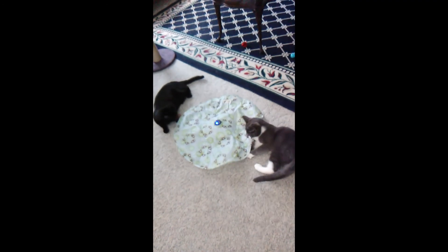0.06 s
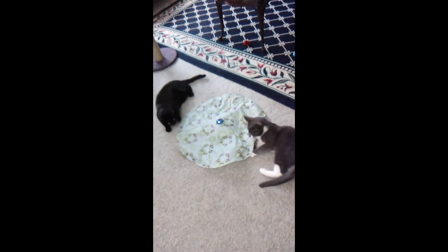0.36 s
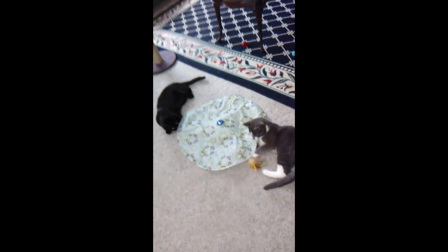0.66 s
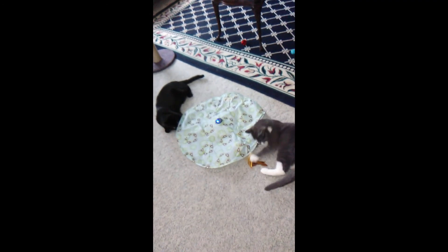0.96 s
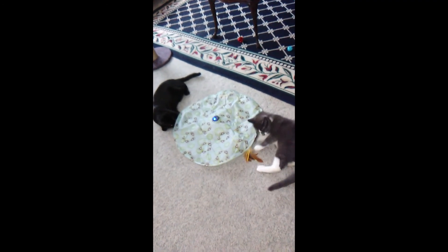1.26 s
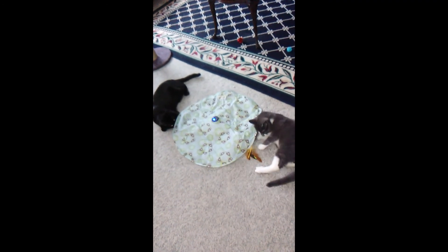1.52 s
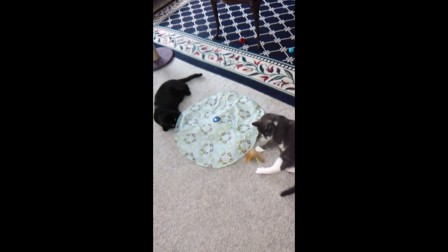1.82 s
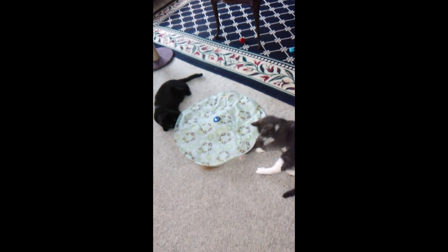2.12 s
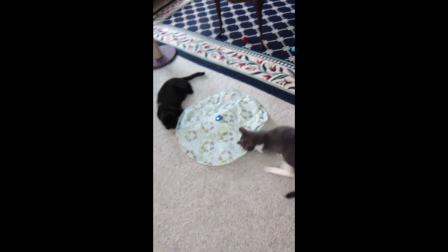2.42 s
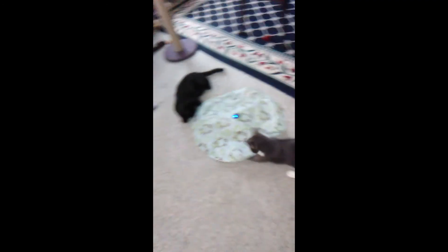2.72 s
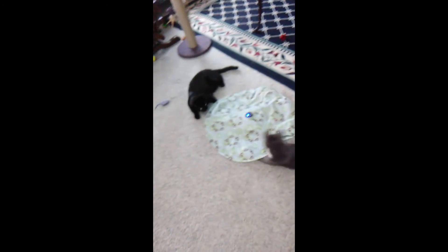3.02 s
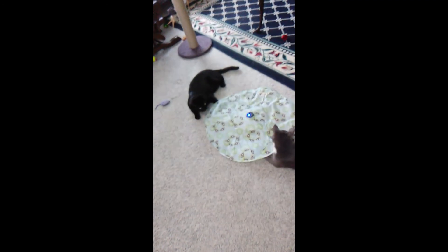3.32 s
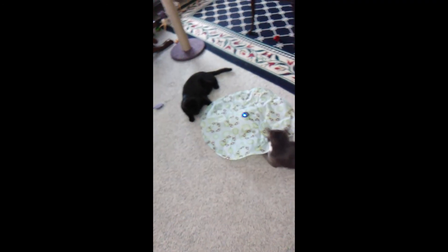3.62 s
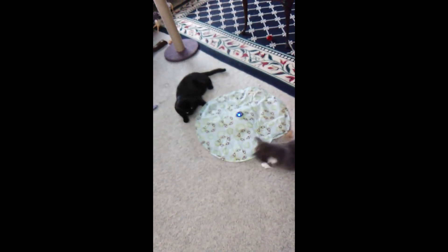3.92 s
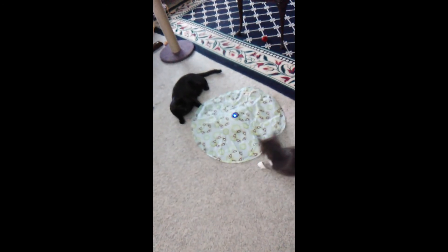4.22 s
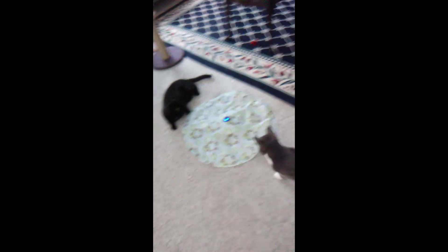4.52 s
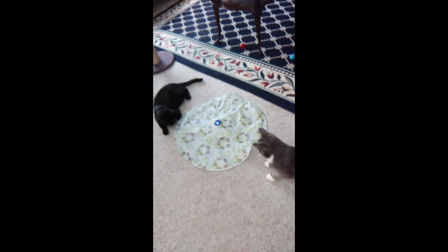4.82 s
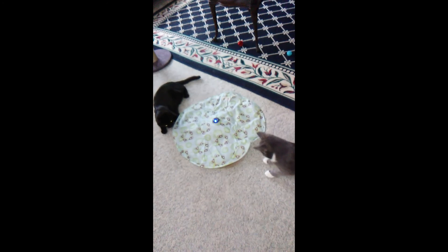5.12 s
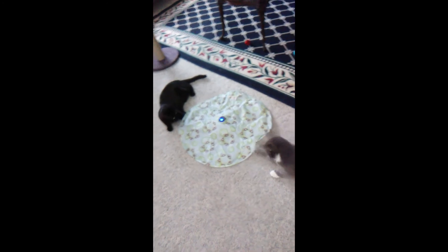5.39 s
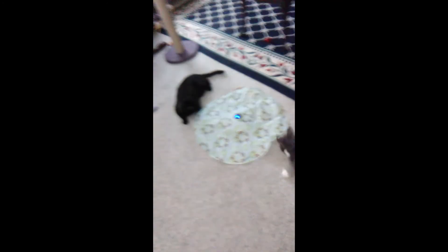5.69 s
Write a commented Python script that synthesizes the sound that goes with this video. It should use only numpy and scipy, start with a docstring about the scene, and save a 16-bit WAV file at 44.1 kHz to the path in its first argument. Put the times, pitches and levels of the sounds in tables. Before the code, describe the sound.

A small geared motor whirrs unsteadily, sweeping a wand beneath a cat toy's nylon cover. The cloth swishes, scrapes and snaps in uneven bursts while cats pat softly at it. After a quieter second the motor resumes with one sharp snap, and busy rustling follows, with light plastic knocks and dull floor thumps. The small carpeted room hums faintly, and the microphone gives the rustle a bright edge.

```python
"""In a small, faintly humming room, a geared motor whirrs and sweeps a wand under a cat toy's nylon cover.
From the start the cloth swishes, scrapes and snaps taut, and soon two cats pat at it. After a quieter
second the motor starts up again, and the loudest snap comes at 2 s. The gears sag under the drag, and the
carpeted floor booms under shifting weight, most near 3 s and 5 s. A short lull at 3.5 s leads into busy
rustling until the end, near 6 s. It is all heard through two microphone ports that ring in the treble."""
import sys
import numpy as np
from scipy import signal
from scipy.fft import rfft, irfft, next_fast_len
from scipy.io import wavfile
from scipy.ndimage import uniform_filter1d, map_coordinates

SR = 44100
rng = np.random.default_rng(int(sys.argv[2]) if len(sys.argv) > 2 else 0)


def bounce(signal):
    """Save signal as a 16-bit WAV file at the path given by the first command-line argument."""
    frames = np.transpose(np.atleast_2d(signal))
    limited = np.clip(frames, -1, 1)
    pcm = np.round(limited * 32767).astype(np.int16)
    wavfile.write(sys.argv[1], SR, pcm)


N = 262395

# folds snapping taut: t/s, level/dB, sheet shake/dB, left minus right/dB, crinkle/dB
# (shake and crinkle are added to the level)
FOLD_SNAPS = [(0.0192, -36.5, -9, 4, -8.5), (0.3153, -35.5, -4, 10, -14), (0.479, -45, -15, -6, -11),
              (0.665, -28, -20, -2, -22.5), (0.6718, -24.5, -24, 1, -29), (1.346, -52, -2.5, 8.5, -14),
              (2.0098, -39.5, -7, 1, -10), (2.0474, -13.5, -16.5, -0.5, -25), (2.352, -31.5, -8, -4, -19),
              (2.5609, -41, 3, -7, -22), (2.6264, -29, -5.5, -3, -13), (2.8843, -35.5, -5, 3, -20),
              (3.146, -46, -8, -2, -18), (3.1971, -28.5, -29, -2, -25), (3.3201, -32.5, -11.5, 5, -24.5),
              (3.368, -34.5, -7, 0, -9.5), (3.4199, -21, -24, -1, -23), (3.428, -26.5, -26, 5, -29),
              (3.8402, -43, 6, -3, -24), (4.2428, -33.5, -24, -5, -18), (4.8941, -36.5, 6.5, 0, -22),
              (5.1751, -25.5, -13, 3, -25), (5.2367, -35.5, -27, 4, -10.5), (5.3818, -35.5, -21, 0, -12.5),
              (5.5428, -30, -33, -2, -19), (5.6049, -33.5, -35, 2, -30), (5.666, -32.5, -30, 9, -12.5),
              (5.673, -29, -33, -10, -18.5), (5.7784, -27.5, -3, -1.5, -26),
              (5.7868, -29.5, -3.5, 3.5, -26)]
# the tone of coarsely scraped cloth: f/Hz, level/dB
SCRAPE_SPECTRUM = [(100, -30), (300, -21), (450, -7.5), (900, -4.5), (1300, 1.5), (1900, 3), (2800, 3),
                   (3500, -4), (4700, -6), (8000, -19.5), (14000, -57)]
# the tone of a crease flipping over: f/Hz, level/dB
CREASE_SPECTRUM = [(300, -5), (1500, -25), (3500, 5.5), (7500, 4), (10500, -1.5), (14500, -18)]


def amp(db):
    """Turn decibels into a gain."""
    return 10 ** (np.asarray(db) / 20)


def unit(x):
    """Scale x to an average (rms) strength of 1."""
    return x / np.sqrt(np.mean(x ** 2) + 1e-20)


def along(points, hz):
    """Read a curve of (frequency, value) points, with octaves evenly spaced."""
    freqs, values = np.transpose(points)
    return np.interp(np.log(hz + 1), np.log(freqs), values)


def wobble(rate):
    """A smooth random curve through rate points a second."""
    points = rng.standard_normal(int(N * rate / SR) + 4)
    return map_coordinates(points, [np.arange(N) * rate / SR])


def gesture(start, rise, hold, fade_db_per_s, sag_db_per_s=0):
    """The gain of one movement: it rises to 1, holds or sags, then fades."""
    t = np.arange(N) / SR - start
    past = np.maximum(t - rise, 0)
    drop_db = sag_db_per_s * past + fade_db_per_s * np.maximum(past - hold, 0)
    return np.clip(t / max(rise, 1e-3), 0, 1) * amp(-drop_db)


def add(track, start, sound):
    """Mix a sound in at start seconds."""
    part = track[:, max(round(start * SR), 0):][:, :sound.shape[1]]
    part += sound[:, :part.shape[1]]


def filtered(x, response):
    """Multiply each frequency in x by response(hz)."""
    n = x.shape[-1]
    size = next_fast_len(n + 8192)
    return irfft(rfft(x, size) * response(np.fft.rfftfreq(size, 1 / SR)), size)[..., :n]


def coloured(x, spectrum, size=4096):
    """Give stereo x this spectrum, with a filter that rings only after each sound."""
    cepstrum = irfft(np.log(amp(along(spectrum, np.fft.rfftfreq(size, 1 / SR)))))
    cepstrum[1:size // 2] *= 2
    cepstrum[size // 2 + 1:] = 0
    ring = irfft(np.exp(rfft(cepstrum)))
    return signal.fftconvolve(x, ring[None], axes=1)[:, :x.shape[1]]


def spread(pair):
    """Two unrelated signals become left and right, alike in the lower tones only."""
    # how alike the two sides are: f/Hz, likeness from 0 to 1
    likeness = [(60, 0.7), (300, 0.74), (750, 0.47), (1400, 0), (14000, 0)]
    turn = lambda hz: np.arccos(np.clip(along(likeness, hz), -1, 1)) / 2
    mid, side = filtered(pair, lambda hz: np.array([np.cos(turn(hz)), np.sin(turn(hz))]))
    return np.array([mid + side, mid - side])


def noise(spectrum, size=N):
    """Steady stereo noise with this spectrum."""
    return unit(coloured(spread(rng.standard_normal((2, size))), spectrum))


def puff(spectrum, t60, size=8192):
    """A burst of noise that fades by 60 dB in t60 seconds."""
    return noise(spectrum, size) * amp(-60 * np.arange(size) / SR / t60)


def slips(rate, scatter_db, smooth_db):
    """Friction: tiny slips of scattered size, rate a second, over a smooth hiss."""
    sizes = amp(scatter_db * np.clip(rng.standard_normal(N), -2, 2))
    sizes *= rng.random(N) < rate / SR
    turn = rng.uniform(0, 2 * np.pi, N)  # every slip sends its sound its own way
    grains = unit(sizes * np.array([np.cos(turn), np.sin(turn)]))
    return spread(grains + amp(smooth_db) * rng.standard_normal((2, N)))


def room_tone():
    """Still air and a faint, slightly unsteady hum."""
    # the tones of the hum: f/Hz, level/dB
    tones = [(61, -78.5), (610, -89), (731, -84.5), (853, -85), (1218, -93)]
    # the hush of the air: f/Hz, level/dB
    air = [(20, -7), (60, -0.5), (110, -1), (200, 0.5), (320, -6.5), (480, -14.5), (750, -6.5), (1100, -16),
           (2000, -14.5), (3500, -20.5), (8000, -27), (9100, -21), (10200, -28), (14500, -28)]
    t = np.arange(N) / SR
    hum = sum(amp(db) * np.sqrt(2) * np.sin(2 * np.pi * hz * t + 1.5 * wobble(4)) for hz, db in tones)
    return hum + amp(-73) * noise(air)


def motor():
    """Drag makes the motor louder and slower. Gives its free gain, its gain with drag, and its pitch."""
    # the motor running freely: t/s, length/s, level/dB
    runs = [(0, .4, -65.5), (0.471, 0.15, -60.5), (1.478, 0.015, -65), (1.782, 1.4, -59),
            (2.874, 0.39, -59.5), (3.621, 0.03, -63.5), (3.8, 1.61, -59.5), (5.427, 0.34, -65.5),
            (5.855, .03, -58.5)]
    # the wand meeting resistance: t/s, length/s, level/dB, pitch drop/Hz
    strains = [(0.009, 0.035, -51.5, 22.6), (0.148, 0.02, -46.5, 6.8), (0.246, 0.052, -45, 22),
               (0.355, 0.033, -55, 5.1), (1.799, 0.037, -48.5, 70), (2.352, .025, -51.5, 14),
               (2.4, .07, -51.5, 184), (2.555, 0.093, -49.5, 11.3), (2.686, 0.13, -64, 11.5),
               (2.922, 0.034, -51, 2.8), (2.996, 0.055, -50.5, 3.9), (3.103, .04, -68, 85),
               (3.196, 0.064, -49, 58), (3.828, 0.039, -45, 46.4), (3.875, 0.048, -52.5, 150),
               (3.932, .05, -51.5, 70), (4.016, .05, -49.5, 50), (4.14, .07, -51.5, 3.33),
               (4.208, 0.052, -50, 3.4), (4.268, 0.202, -55.5, 27.8), (4.49, 0.098, -51, 25.3),
               (4.673, 0.16, -56.5, 2.8), (4.84, 0.22, -50, 32.4), (5.112, .04, -46.5, 44),
               (5.178, 0.034, -44.5, 4.1), (5.253, .11, -51.5, 15), (5.375, 0.032, -50.5, 98)]
    rise_s, free_hz = 0.0117, 795.0
    push = lambda start, length: gesture(start, rise_s, length - rise_s, fade_db_per_s=260)
    running = np.max([amp(db) * push(start, length) for start, length, db in runs], axis=0)
    power, gear_hz = running ** 2, np.full(N, free_hz)
    for start, length, db, drop_hz in strains:
        load = push(start, length)
        power += (amp(db) * load) ** 2
        gear_hz -= drop_hz * load
    return running, np.sqrt(power), gear_hz


def housing(hz):
    """The toy's hollow plastic body rings at a few pitches of its own."""
    # its resonances: f/Hz, width/Hz, level/dB
    rings = [(536.6, 23, -19), (611.5, 10.8, -4.5), (716.6, 63, -1.5), (737, 86, -4), (806, 23, -1.5),
             (1011, 91, -9.5), (1032, 49, -6), (1233, 33, -12)]
    return sum((-1) ** k * amp(db) * 1j * hz * width / (centre ** 2 - hz ** 2 + 1j * hz * width)
               for k, (centre, width, db) in enumerate(rings))


def gears(effort, gear_hz):
    """The gears whirr unsteadily, and their rattle rings the housing."""
    pitch = gear_hz * (1 + 0.017 * wobble(70))
    tone = np.sin(2 * np.pi * np.cumsum(pitch) / SR)
    whirr = unit(tone * amp(4 * wobble(75)))
    rattle = unit(filtered(slips(rate=280, scatter_db=2, smooth_db=-14), housing))
    return amp(-1.5) * effort * unit(0.8 * whirr + rattle)


def rubbing(running):
    """Gains of swish and scrape: each stroke drives both, over the light brushing of the turning wand."""
    # wand or paw dragging the cloth: t/s, rise/s, hold/s, swish level/dB, scrape level/dB
    strokes = [(-0.004, 0.028, 0.01, -46, -45.5), (0.147, 0.022, 0.013, -56, -46.5),
               (0.179, 0.022, 0.035, -45.5, -50), (0.234, 0.05, 0.049, -44, -43),
               (0.35, 0.011, 0.014, -54, -54.5), (0.437, 0.012, .025, -60.5, -55),
               (0.508, 0.015, 0.086, -67.5, -80), (.659, 0.0072, 0.016, -44.5, -73),
               (1.184, 0.023, 0.064, -54, -68), (1.215, 0.016, 0.0076, -64, -54.5),
               (1.333, 0.0093, 0.049, -61.5, -60.5), (1.793, 0.0097, 0.024, -63, -50.5),
               (1.861, .02, 0.15, -62.5, -64), (1.999, 0.053, 0.094, -42, -40.5),
               (2.213, 0.031, 0.018, -45, -49.5), (2.346, 0.002, 0.059, -48, -42.5),
               (2.429, 0.038, 0.022, -43.5, -47), (2.502, 0.0092, 0.034, -64, -49.5),
               (2.542, 0.014, 0.035, -46, -43.5), (2.6, .02, 0.041, -45.5, -43),
               (2.7, 0.017, 0.038, -52.5, -58.5), (2.838, 0.036, 0.0098, -54.5, -51),
               (2.878, 0.0034, 0.052, -51.5, -47), (2.976, 0.031, 0.14, -51, -48.5),
               (3.142, 0.0032, 0.023, -53, -44), (3.176, 0.012, 0.077, -48.5, -47),
               (3.307, 0.0029, 0.051, -55.5, -60), (3.354, .008, 0.029, -56, -48.5),
               (3.416, 0.0027, 0.0099, -39.5, -77), (3.605, .02, 0.022, -74, -76),
               (3.831, 0.0048, 0.034, -55, -47.5), (3.894, 0.028, 0.11, -59.5, -57),
               (4.006, 0.054, .02, -48.5, -49.5), (4.128, 0.014, .03, -70, -57),
               (4.181, 0.026, .05, -47.5, -49), (4.301, 0.052, 0.067, -48.5, -54),
               (4.38, 0.018, .04, -48, -48.5), (4.463, .04, .012, -45.5, -43.5),
               (4.56, .015, 0.012, -60, -81), (4.701, .03, .025, -49.5, -50.5),
               (4.752, 0.012, 0.013, -47, -46.5), (4.794, 0.062, .05, -44.5, -44.5),
               (4.886, 0.017, 0.058, -46, -41), (5.004, 0.037, .06, -48.5, -44),
               (5.164, .005, 0.032, -52.5, -45.5), (5.23, 0.0088, .05, -54, -49.5),
               (5.287, .04, 0.046, -48, -44), (5.406, 0.019, .02, -58, -79),
               (5.46, 0.021, 0.075, -52, -54.5), (5.604, 0.0058, .04, -55.5, -59.5),
               (5.658, 0.0032, 0.054, -48.5, -52.5), (5.755, .01, 0.02, -45.5, -48.5),
               (5.864, .015, .01, -75, -64.5)]
    swish_power, scrape_power = (amp(-22.5) * running) ** 2, (amp(-9) * running) ** 2
    for start, rise, hold, swish_db, scrape_db in strokes:
        power = gesture(start, rise, hold, fade_db_per_s=230, sag_db_per_s=18.5) ** 2
        swish_power += amp(swish_db) ** 2 * power
        scrape_power += amp(scrape_db) ** 2 * power
    return np.sqrt(swish_power), np.sqrt(scrape_power)


def flicker(x, depth_db, bands):
    """Brief random lifts and dips in narrow bands make the sound flicker faintly in colour."""
    spectra = signal.stft(x, nperseg=512)[2]
    lifts = rng.standard_normal(spectra.shape[1:])
    for _ in range(2):  # blur over neighbouring bands, then over time
        lifts = uniform_filter1d(lifts, size=bands, axis=0)
        lifts = uniform_filter1d(lifts, size=5, axis=1)
    return signal.istft(spectra * amp(depth_db * unit(lifts)), nperseg=512)[1][:, :N]


def cover(running):
    """The nylon swishes, crinkles and scrapes; swish and scrape catch and let go together."""
    # the tone of finely swishing nylon: f/Hz, level/dB
    nylon = [(500, -40), (2000, -39), (3800, -21), (5500, 3), (7500, 0), (10000, -1), (12000, -5),
             (14500, -13.5)]
    # how bright the swish is: t/s, upper minus lower treble/dB
    brightness = [(0, 3), (.5, -11), (.7, 5), (1.8, -5), (1.95, 23), (2.1, -8), (2.6, 4), (3.4, 5.5),
                  (4.05, 8), (4.5, -2), (4.9, -1.5), (5.3, 11.5), (5.8, 0)]
    catch = amp(1.2 * wobble(60))
    fine = flicker(slips(rate=1300, scatter_db=4.5, smooth_db=1), depth_db=3, bands=4)
    coarse = flicker(slips(rate=1100, scatter_db=3.5, smooth_db=1), depth_db=2.8, bands=2)
    swish = unit(coloured(fine, nylon) * catch)
    scrape = unit(coloured(coarse, SCRAPE_SPECTRUM) * catch)
    crinkles = unit(coloured(slips(rate=63, scatter_db=0.5, smooth_db=-33), CREASE_SPECTRUM))
    dull = filtered(swish, lambda hz: 1 / (1 + (hz / 7000) ** 4))
    times, tilt_db = np.transpose(brightness)
    tilt = amp(np.interp(np.arange(N) / SR, times, tilt_db) / 2)
    swish = dull / tilt + (swish - dull) * tilt + amp(-12) * crinkles
    swish_gain, scrape_gain = rubbing(running)
    return amp(-5.5) * swish_gain * swish + amp(-0.7) * scrape_gain * scrape


def sticking(depth_db, lead_s):
    """The cloth catches and hushes for a moment before each fold lets go."""
    t = np.arange(N) / SR
    releases = np.sort([start for start, *_ in FOLD_SNAPS] + [np.inf])
    wait = releases[np.searchsorted(releases, t)] - t
    held = np.clip(1 - wait / lead_s, 0, 1)
    return amp(-depth_db * held)


def zips():
    """Threads passing unevenly under a tip give a short, breathy, gliding tone."""
    # claws and wand sliding over the weave: t/s, length/s, first f/Hz, last f/Hz, level/dB
    slides = [(0.016, 0.049, 1350, 1460, -46), (0.348, 0.053, 1854, 2274, -47.5),
              (.565, 0.1, 817, 1033, -60), (1.343, 0.035, 2910, 2490, -60),
              (1.383, 0.038, 1930, 1315, -61.5), (1.486, 0.046, 878, 731, -58.5),
              (2.346, .025, 3315, 2910, -44.5), (2.374, 0.03, 1660, 1470, -39.5),
              (2.923, 0.024, 825, 795, -52), (3.147, 0.029, 2946, 2820, -42),
              (4.389, 0.0667, 3000, 2670, -45.5), (5.081, 0.023, 3600, 3806, -41.5),
              (5.659, .08, 1380, 1560, -53.5), (5.778, 0.037, 1216, 1300, -50)]
    out = np.zeros((2, N))
    for start, length, first_hz, last_hz, db in slides:
        threads = filtered(rng.standard_normal((2, 8192)), lambda hz: 1 / (1 + (hz / 130) ** 2))
        progress = np.linspace(0, 1, int(length * SR))
        pitch = first_hz + (last_hz - first_hz) * progress
        tone = np.sin(2 * np.pi * np.cumsum(pitch) / SR)
        swell = np.minimum(progress / 0.21, 1) * np.sqrt(1 - progress)
        add(out, start, amp(db + 2.5) * swell * unit(threads[:, :len(tone)]) * tone)
    return out


def snaps():
    """A fold flips with one sharp tick, shakes the sheet and sets smaller creases crinkling."""
    out = np.zeros((2, N))
    for start, db, shake_db, pan_db, crinkle_db in FOLD_SNAPS:
        tick = puff(CREASE_SPECTRUM, t60=0.003)
        tick *= amp(3.5) / np.linalg.norm(tick, axis=1, keepdims=True)
        crinkle = amp(crinkle_db - 2) * puff(CREASE_SPECTRUM, t60=0.17)
        shake = amp(shake_db - 8) * puff(SCRAPE_SPECTRUM, t60=0.091)
        pan = amp([[pan_db / 2], [-pan_db / 2]])
        add(out, start, amp(db) * pan * (tick + crinkle + shake))
    return out


def floor_booms():
    """Shifting weight makes the floor rumble and boom at its lowest note."""
    # weight coming down: t/s, length/s, level/dB
    steps = [(.125, .04, -60), (0.255, .05, -61), (0.78, 0.085, -66), (1.125, 0.055, -61),
             (1.58, 0.54, -68), (1.968, .06, -56), (2.055, 0.047, -59), (2.71, 0.037, -73),
             (2.984, 0.11, -49.5), (3.141, .05, -52), (3.333, .06, -53.5), (3.494, 0.054, -61),
             (3.62, .23, -70), (4.46, 0.049, -67), (4.59, 0.048, -65), (5.195, 0.09, -50.5),
             (5.3, 0.082, -60), (5.691, 0.075, -54)]
    # the tone of the rumble: f/Hz, level/dB
    rumble = [(20, -38), (38, 3), (55, 11.5), (75, 2), (110, -1.5), (170, -7.5), (350, -48), (1000, -45)]
    note_hz, rise_s = 61.9, 0.028
    note = unit(np.sin(2 * np.pi * note_hz * np.arange(N) / SR + 0.65 * wobble(9.3)))
    power = sum((amp(db) * gesture(start, rise_s, length - rise_s, fade_db_per_s=122)) ** 2
                for start, length, db in steps)
    gain = np.sqrt(power + amp(-76.5) ** 2)  # never quite silent
    return gain * (amp(-3) * note + amp(-5) * noise(rumble))


def knocks():
    """The wand knocks when it is stopped, and the housing rings."""
    # each knock: t/s, peak level/dB
    hits = [(0.283, -31.5), (1.802, -38.5), (2.351, -38.5), (2.559, -36), (2.925, -35.5), (3.84, -36)]
    out = np.zeros((2, N))
    fade = amp(-60 * np.arange(8192) / SR / 0.035)
    for start, db in hits:
        ring = filtered(spread(rng.standard_normal((2, len(fade))) * fade), housing)
        rasp = amp(-23.5) * puff(SCRAPE_SPECTRUM, t60=0.067)
        add(out, start, amp(db) * (ring / np.abs(ring).max() + rasp))
    return out


def paws():
    """Paws land on cloth and carpet with soft, dull pats."""
    # each pat: t/s, level/dB, f/Hz
    pats = [(0.669, -52, 270), (0.805, -66.5, 219), (0.88, -65, 224), (0.941, -66.5, 172),
            (1.232, -59, 450), (1.804, -63, 280), (2.05, -56, 490), (2.36, -52, 450), (2.608, -51, 401),
            (2.888, -59.5, 456), (3.21, -54.5, 480), (3.245, -49.5, 450), (3.87, -57.5, 477.5),
            (4.051, -65, 477), (4.19, -63, 200), (4.454, -53.5, 396.6), (4.898, -59, 477),
            (5.079, -59, 478), (5.337, -58, 451.7), (5.78, -68, 299)]
    # the tone of a pat: multiple of its pitch, level/dB
    pat_shape = [(.2, -27.5), (.6, -10), (1, -2.5), (1.5, -1), (4, -32)]
    out = np.zeros((2, N))
    for start, db, hz in pats:
        spectrum = [(hz * multiple, band_db) for multiple, band_db in pat_shape]
        add(out, start, amp(db) * puff(spectrum, t60=0.2))
    return out


def walls(x):
    """The carpeted room answers with a short, blurred echo."""
    # how long the echo lasts: f/Hz, time to fade by 60 dB/s
    fade_times = [(100, 0.078), (800, 0.2), (2500, 0.1), (8000, 0.13), (14000, 0.2)]
    hz, t, spectra = signal.stft(rng.standard_normal((2, SR // 2)), SR, nperseg=256)
    spectra *= amp(-60 * t / along(fade_times, hz)[:, None])
    tail = spread(signal.istft(spectra, SR, nperseg=256)[1])
    tail *= 1 - np.exp(-np.arange(tail.shape[1]) / SR / 0.0039)  # the echo builds up
    return signal.fftconvolve(x, tail / np.linalg.norm(tail[0]), axes=1)[:, :N]


def scene():
    """Mix the toy, the cats and the room."""
    # how the toy's sound leans to one side: f/Hz, left minus right/dB
    balance = [(400, 0), (1000, -1), (1500, 1.5), (2500, 6), (3500, 3.5), (5000, 0), (11000, -2),
               (13500, -7.5)]
    running, effort, gear_hz = motor()
    rustle = cover(running) * sticking(depth_db=5.5, lead_s=0.02) + zips()
    cracks = snaps()
    toy = rustle + cracks + gears(effort, gear_hz) + knocks()
    toy += walls(amp(-7.5) * rustle + amp(-5.5) * cracks)
    lean = lambda hz: amp(np.array([along(balance, hz), -along(balance, hz)]) / 2)
    return filtered(toy, lean) + floor_booms() + paws() + room_tone()


def record(dry):
    """The hollow of each microphone port rings in the treble; the very highest tones are cut off."""
    # the ports, left then right: f/Hz, width/Hz, boost/dB
    ports = [(8940, 780, 14), (7660, 960, 11)]
    ringing = lambda hz: np.array([
        1 + (amp(db) - 1) * 1j * hz * width / (centre ** 2 - hz ** 2 + 1j * hz * width)
        for centre, width, db in ports])
    return filtered(filtered(dry, ringing), lambda hz: hz < 14500)


dry = scene()
out = record(dry)
bounce(out)
```